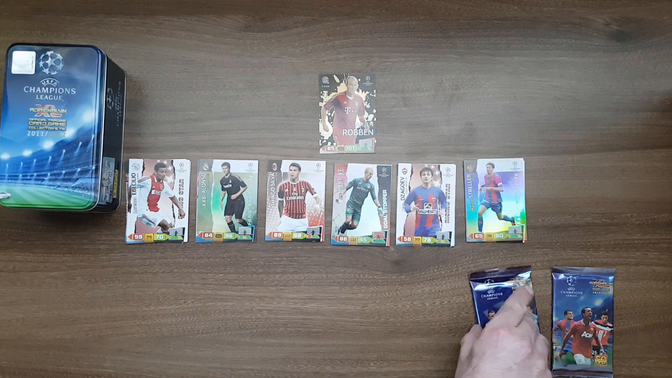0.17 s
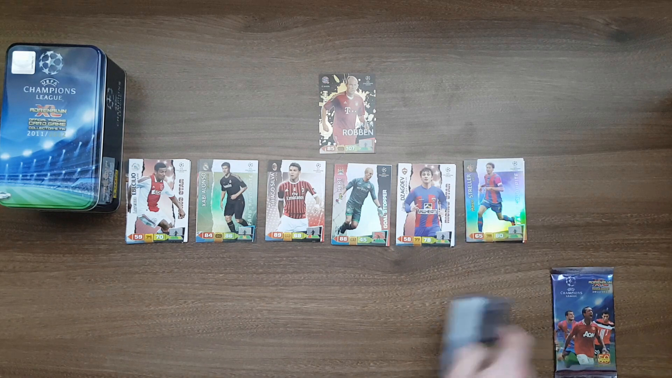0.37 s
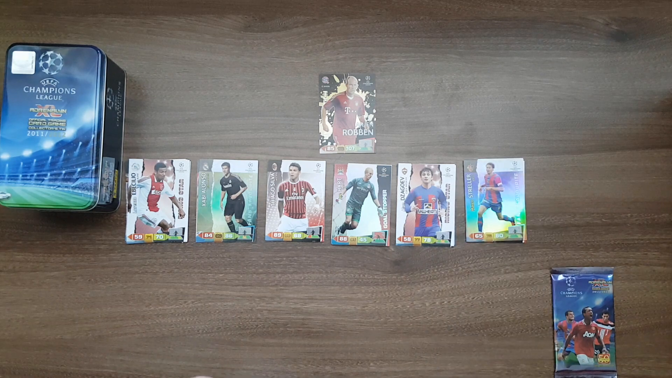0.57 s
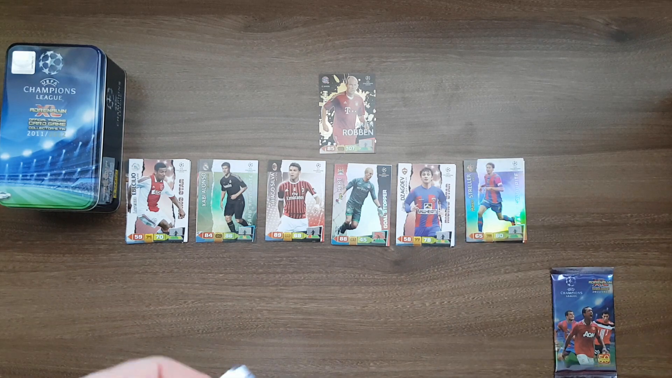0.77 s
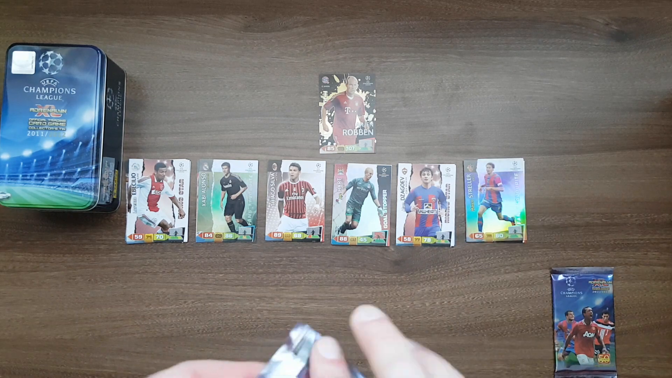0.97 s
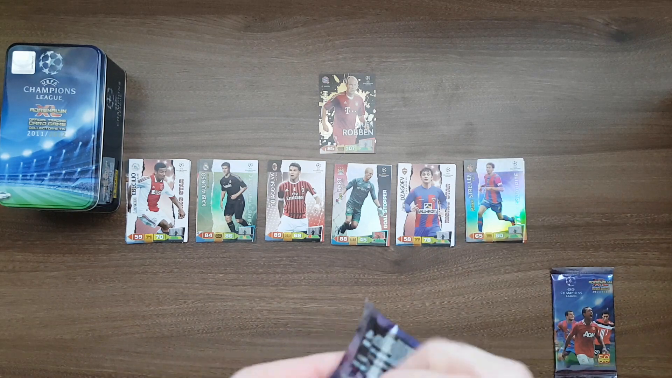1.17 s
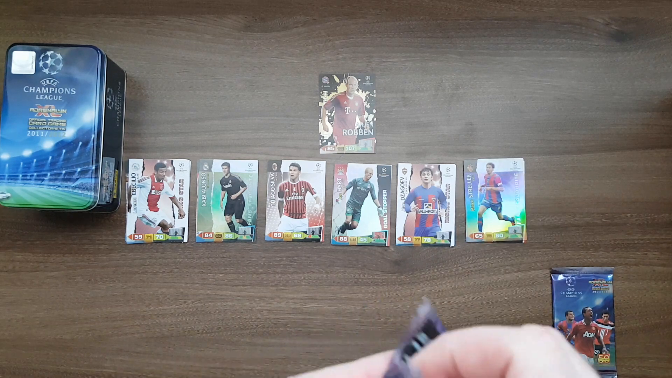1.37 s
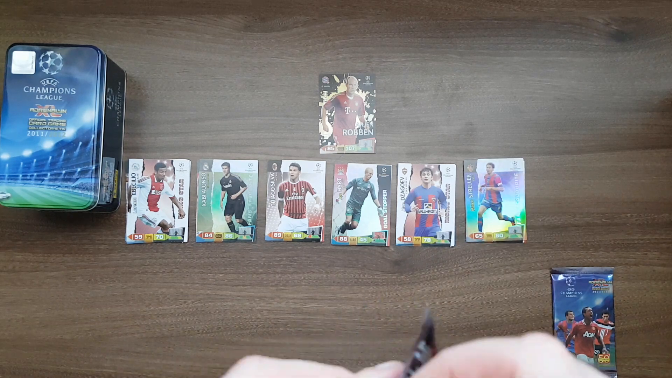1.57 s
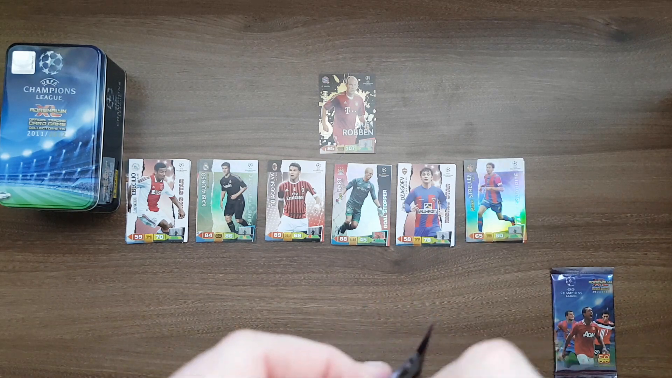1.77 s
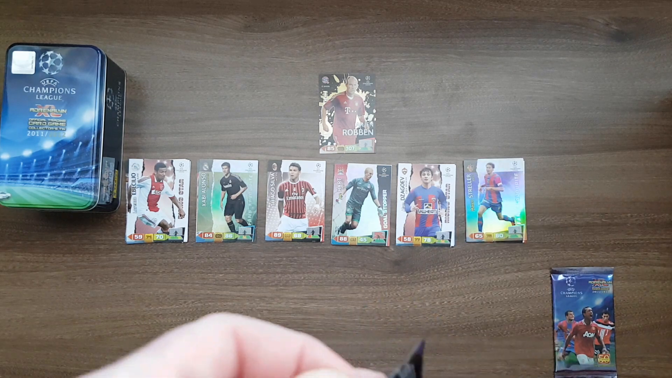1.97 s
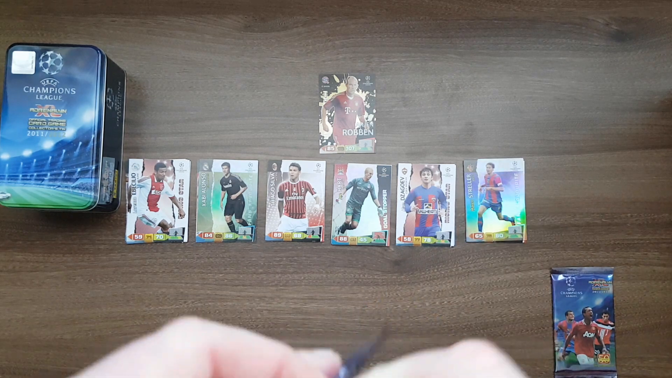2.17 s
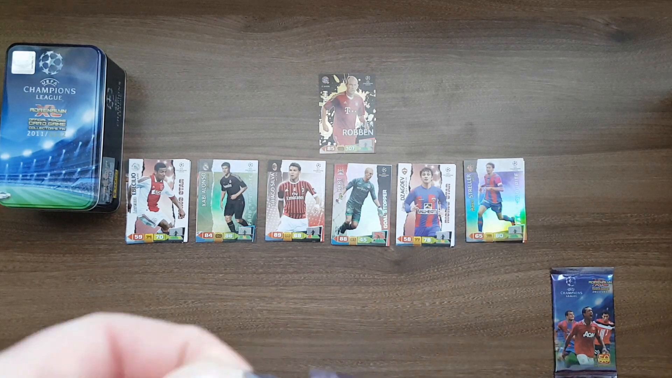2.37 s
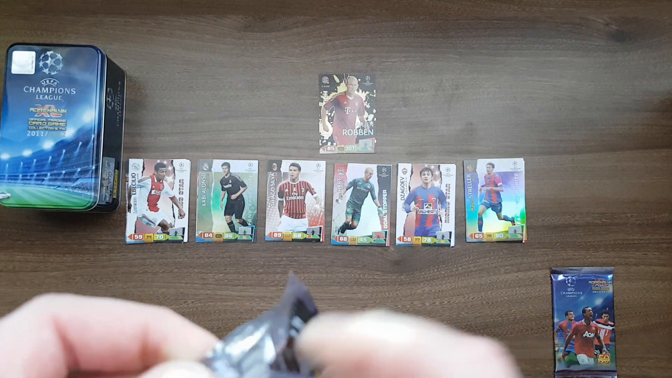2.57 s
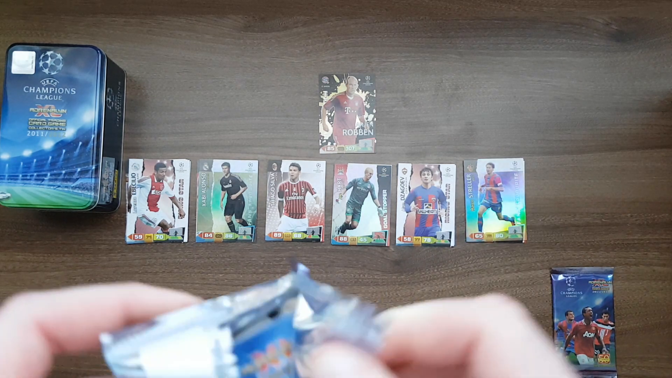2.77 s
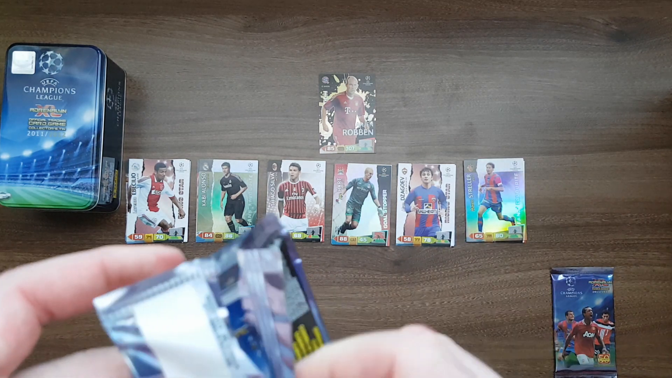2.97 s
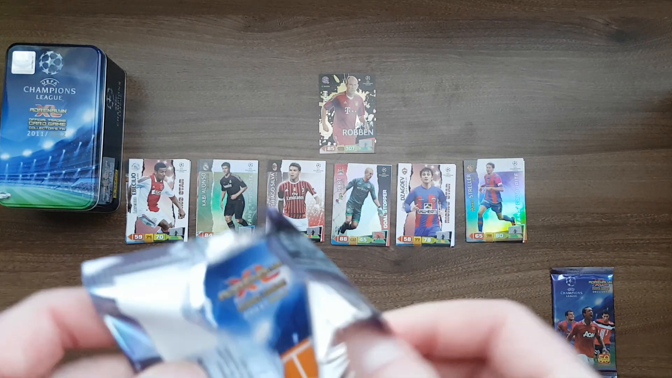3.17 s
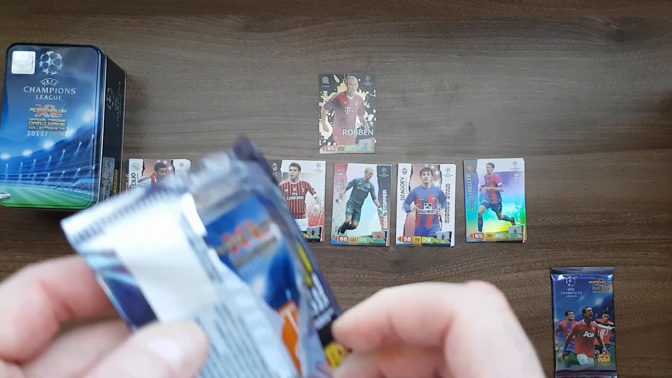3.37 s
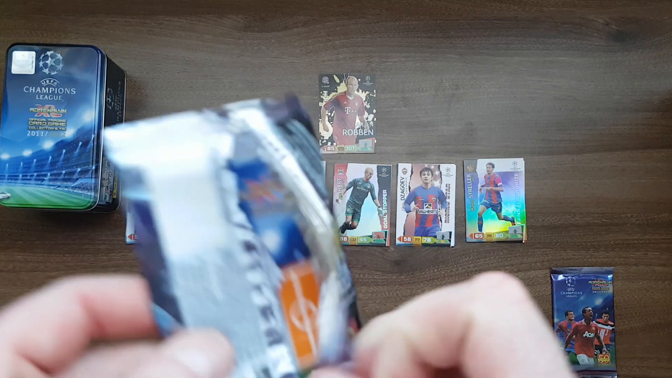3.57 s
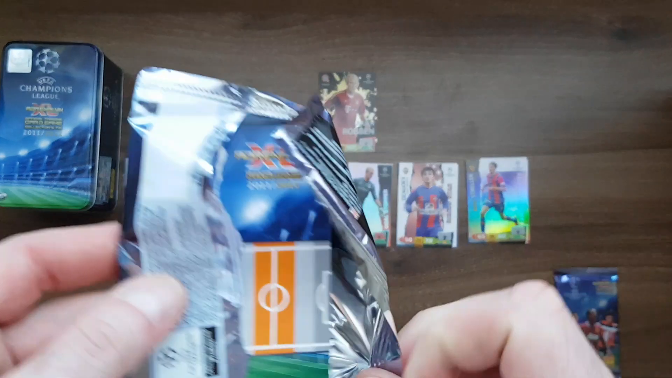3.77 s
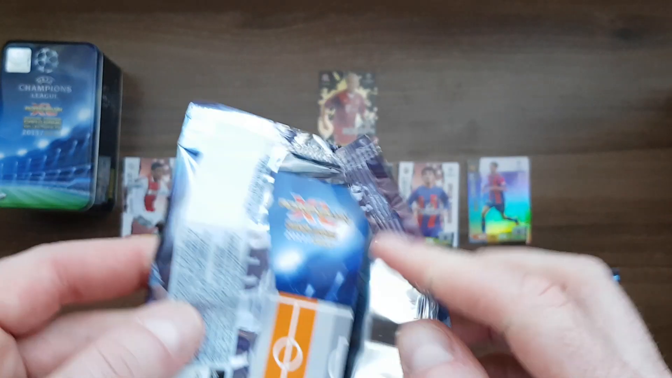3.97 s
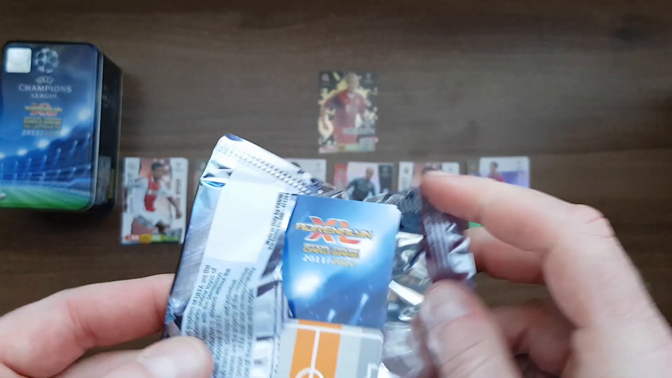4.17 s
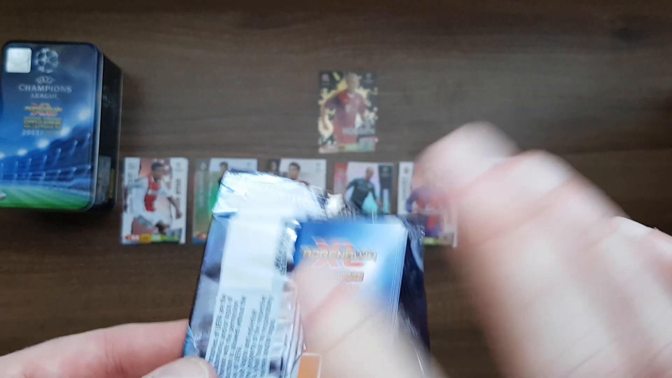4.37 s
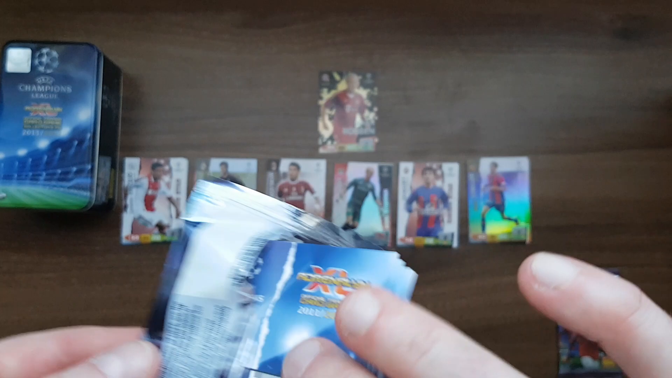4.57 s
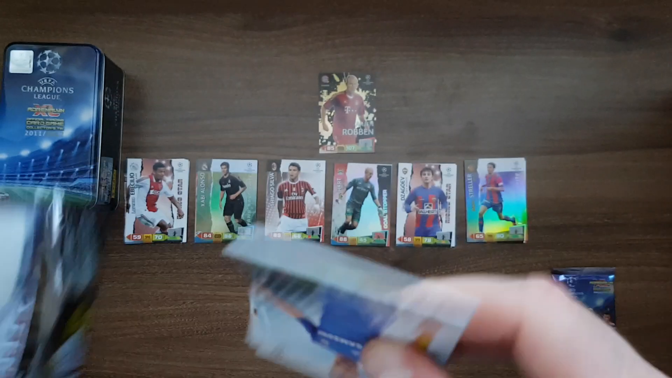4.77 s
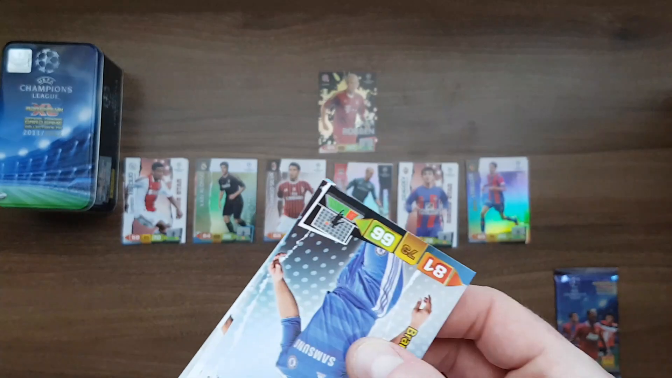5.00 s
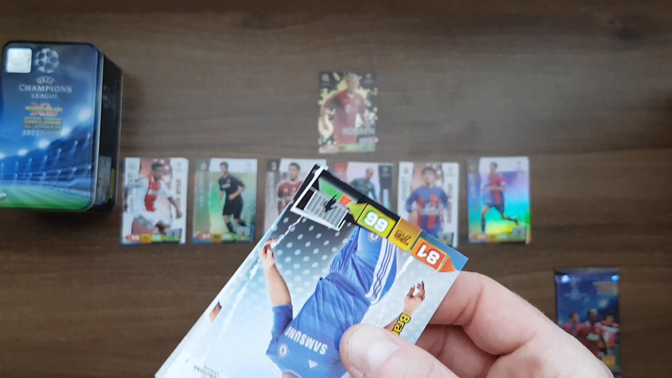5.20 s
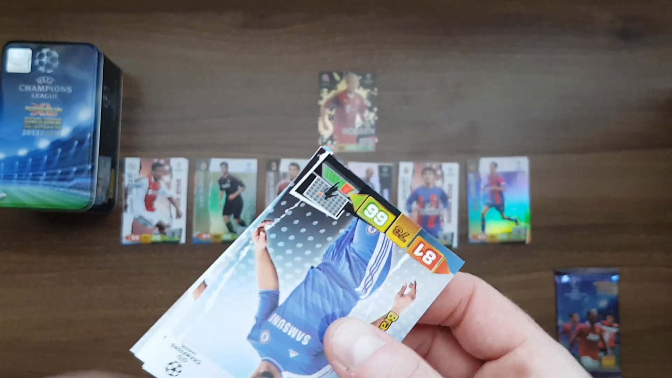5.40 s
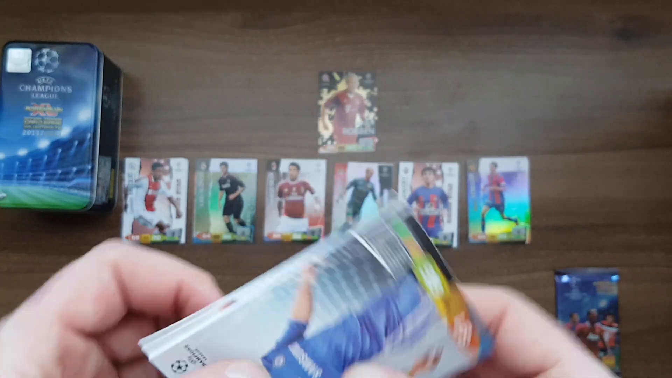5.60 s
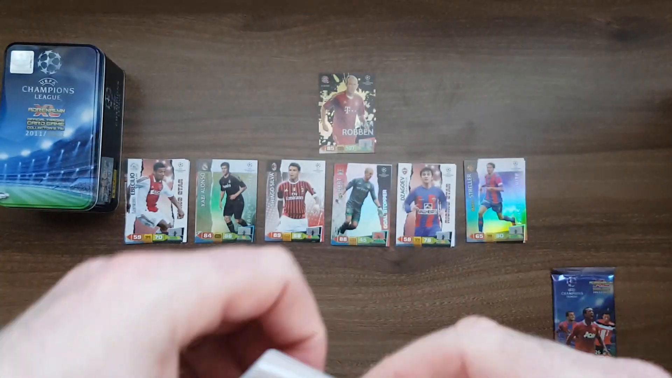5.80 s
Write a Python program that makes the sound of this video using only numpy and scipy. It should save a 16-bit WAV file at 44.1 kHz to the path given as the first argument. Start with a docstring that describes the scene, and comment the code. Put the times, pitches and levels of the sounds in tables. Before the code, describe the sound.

In a small, quiet room with faint air noise and a low hum, a foil packet is handled very close to a stereo microphone, nearer the left side. From 0 to 0.5 s there is only a soft slide and light scuff on wood. From about 0.7 s crinkling begins, and from 1.1 to 2.3 s thin, taut foil gives sharp irregular snaps with sparse crackle between them. At 2.4 s a strong ripping burst hits, then crackling grows denser, with peaks near 3.25 and 3.7 s. The opened wrapper sounds fuller and looser, with dull low pops as its panels flex, especially from 2.6 to 4.4 s. Crackle thins after 4.0 s and ends around 4.9 s with a few snaps. Afterwards only very faint card slides, tiny ticks and one soft low bump near 5.6 s remain over the quiet room.

```python
"""A foil packet of trading cards is slid off a wooden table, pinched, torn open and emptied close to the mic.
Creases buckle as sharp band-coloured clicks over a dense crinkle of random smaller ones.
Once open, the wrapper flexes with dull pops of damped modes and sounds fuller; at the end the cards slide out
as resonant noise with a few faint ticks. The two-port microphone stands in a small, quiet room with a faint hum."""
import sys
import numpy as np
from scipy import signal
from scipy.fft import rfft, irfft, next_fast_len
from scipy.io import wavfile
from scipy.ndimage import uniform_filter1d

SR = 44100
rng = np.random.default_rng(int(sys.argv[2]) if len(sys.argv) > 2 else 0)


def wrap_up_sound(samples):
    """Save the sound to the file named by the first command line argument, as 16-bit audio."""
    columns = np.atleast_2d(samples).T
    # keep every value between -1 and 1, then stretch to whole-number steps
    tamed = np.clip(columns, -1, 1)
    steps = np.round(tamed * 32767).astype(np.int16)
    wavfile.write(sys.argv[1], SR, steps)


N = 257544
TIME = np.arange(N) / SR
EDGES = np.geomspace(55, 17500, 18)  # band edges, Hz
CENTRES = np.sqrt(EDGES[1:] * EDGES[:-1])


def from_db(db):
    """Decibels to an amplitude factor."""
    return 10 ** (np.asarray(db) / 20)


def rms_one(x):
    """Scale to unit rms."""
    return x / np.sqrt(np.mean(x ** 2) + 1e-20)


def at_hz(points, hz):
    """Read a table on a log-frequency axis."""
    f, value = np.transpose(points)
    return np.interp(np.log(np.maximum(hz, 1)), np.log(f), value)


def band(x, k):
    """The k-th half-octave band."""
    sos = signal.butter(2, EDGES[k:k + 2], "band", fs=SR, output="sos")
    return signal.sosfilt(sos, x + 1e-18)


def coloured(x, points, lag=0):
    """Give x a spectrum, and delay it by lag seconds."""
    size = next_fast_len(N + SR // 10)
    hz = np.arange(size // 2 + 1) * SR / size
    response = from_db(at_hz(points, hz)) * np.exp(-2j * np.pi * hz * lag)
    return irfft(rfft(x, size) * response, size)[..., :N]


def drift(rate):
    """Smooth chance with the given number of turns a second."""
    knots = rng.standard_normal(N // 20)
    return np.interp(TIME * rate, np.arange(len(knots)), knots)


# still air of the room: f/Hz, relative level per Hz/dB
AIR_COLOUR = [(15, -31), (25, 0), (74, -20), (92, -4.5), (111, -6), (153, -13), (263, -11.5), (363, -16.5),
              (503, -17.5), (560, -19.5), (1610, -23), (6210, -36), (16000, -35)]
AIR_DB = -67
HUM_HZ, HUM_DB = 112, -77.5


def still_room(likeness=0.35):
    """Air noise partly shared by the two ports, under a low hum whose phase wavers."""
    shared, *own = rng.standard_normal((3, N))
    noise = np.sqrt(likeness) * shared + np.sqrt(1 - likeness) * np.array(own)
    air = rms_one(coloured(noise, AIR_COLOUR))
    hum = rms_one(np.sin(2 * np.pi * HUM_HZ * TIME + .5 * drift(9.1)))
    return from_db(AIR_DB) * air + from_db(HUM_DB) * hum


# packet, fingers and cards sliding: start t/s, length/s, relative level/dB, centre f/Hz,
# width of each of two stacked resonators f/Hz
SLIDE_STROKES = [(0.026, 0.36, -68, 2780, 1030), (0.057, 0.23, -68, 10400, 8050),
                 (0.16, .14, -53, 153, 268), (0.161, 0.16, -61.5, 870, 1180), (0.34, 0.061, -49, 2100, 404),
                 (0.334, 0.16, -59, 353, 453), (0.391, 0.03, -40, 1700, 905),
                 (0.382, 0.079, -49.5, 6600, 9100), (0.41, 0.24, -68, 2020, 2230),
                 (0.648, 0.11, -54.5, 418, 420), (0.974, .05, -49.5, 1130, 357),
                 (4.8, .12, -64, 7300, 1200), (4.98, 0.23, -67, 2530, 3030), (5.126, .11, -68, 7000, 2520),
                 (5.133, 0.091, -64, 2380, 1106), (5.463, .2, -77.5, 4500, 5040)]
SLIDE_RISE_SHARE = 0.15  # part of a stroke spent swelling


def slides(level_db=0.0, grain_db=2.5):
    """Uneven friction drives one broad resonance while the stroke swells and fades."""
    out = 0
    for start, length, db, hz, width in SLIDE_STROKES:
        friction = rng.standard_normal(N) * from_db(grain_db * drift(395.2))
        r = np.exp(-np.pi * width / SR)
        resonator = [0.92, 0.0077, -1, 1, -2 * r * np.cos(2 * np.pi * hz / SR), r * r]
        rub = signal.sosfilt([resonator] * 2, friction)
        stroke = np.interp((TIME - start) / length, [0, SLIDE_RISE_SHARE, 1], [0, 1, 0])
        out = out + from_db(db + level_db) * stroke * rms_one(rub)
    return out


def dying(power, t60):
    """Spread energy over an exponential tail, its t60 held to 0.002-0.5 s."""
    r = from_db(-120 / (np.clip(t60, .002, .5) * SR))  # twice 60 dB, since this is power
    return signal.lfilter([1 - r], [1, -r], power + 1e-18)


# decay of the small room, before the limit in dying(): f/Hz, t60/s
WALL_DECAY = [(210, 0.75), (1300, 0.29), (4000, 0.25), (10000, 0.2)]
# reverberant against direct sound at this close distance, before patchiness: f/Hz, level/dB
WALL_LEVEL = [(100, -11), (400, -10.5), (1500, -4), (4000, -2.5), (8000, -6.5), (15000, -11)]


def room(x, scatter_db=-2.5, scatter_t60=0.022, build_t60=0.0093, patchy_db=3.5):
    """Hands and table scatter each sound at once, walls add a short tail; the packet moves, so tails vary."""
    out, white = x.copy(), rng.standard_normal((2, 3, N))
    for k, hz in enumerate(CENTRES):
        # the ports hear nearly the same diffuse sound only in the bass
        alike = at_hz([(300, .9), (1200, 0.18), (3000, 0.017)], hz)
        noise = np.sqrt(alike) * white[k % 2, 0] + np.sqrt(1 - alike) * white[k % 2, 1:]
        diffuse = rms_one(band(noise, k))
        power = band(x[0], k) ** 2
        near = from_db(2 * scatter_db) * dying(power, scatter_t60)
        tail = dying(dying(power, build_t60), at_hz(WALL_DECAY, hz))
        walls = from_db(2 * at_hz(WALL_LEVEL, hz)) * tail
        patchy = from_db(patchy_db * drift(35) + 0.5)  # its colour shifts as the sheet bends
        out += diffuse * np.sqrt(near + walls) * patchy
    return out


def clicks(at, heights):
    """Impulses at the given samples."""
    return np.bincount(np.clip(at, 0, N - 1), heights, N)


def buckles(at, signs, band_db, colour_spread_db, path_spread_s):
    """Sharp clicks from many places: each has its own colour, and its own lag between the ports."""
    lag = path_spread_s * SR * rng.standard_normal(N)[at]
    out = np.zeros((2, N))
    for k, hz in enumerate(CENTRES):
        both, left, right = rng.standard_normal((3, N // 16))[:, np.arange(len(at)) % (N // 16)]
        for port, (own, late) in enumerate([(left, 0), (right, lag)]):
            colour = colour_spread_db * (both + own) / np.sqrt(2)
            heights = signs * from_db(band_db(hz) + colour)
            impulses = clicks(np.round(at + late).astype(int), heights)
            out[port] += band(impulses, k) * (-1) ** k  # every other band is inverted
    return out


# sharp snaps: creases buckling in the hands, and from 5 s a few faint ticks of the cards:
# t/s, relative level/dB, body at 900 Hz against that level/dB
SHARP_SNAPS = [(0.5274, -36.5, 8), (0.7292, -19, 11), (0.7895, -21, 10.5), (0.8496, -22.5, 3),
               (0.945, -23, -7), (0.989, -16, 1), (1.072, -4, -22), (1.1605, -14, -12), (1.179, -5.5, -4.5),
               (1.2552, -5.5, -8.5), (1.2806, -4.5, -22), (1.2928, -23, -19), (1.304, -17, -3.5),
               (1.3273, -9, -15), (1.3667, -8.5, -19), (1.3965, -10.5, -1), (1.4863, -2, -46),
               (1.526, -12.5, -2.5), (1.6401, -9, -1.5), (1.7639, -13, -18), (1.842, -24, -2),
               (1.8623, -21, -3.5), (1.961, -15.5, 1), (1.9873, -6.5, -20.5), (2.0456, -17, -8),
               (2.0757, -24.5, -0.5), (2.1128, -18, -5), (2.1464, -11.5, -7), (2.2378, -4.5, -10.5),
               (2.3417, -10.5, -10.5), (2.3769, 1.5, 1.5), (2.403, -8.5, 10), (2.4224, -2, 3.5),
               (2.525, -14.5, 13.5), (2.5763, -13.5, 1), (2.5985, -7.5, 8), (2.6379, -5, -1.5),
               (2.744, -16, 8.5), (2.761, -10.5, -2.5), (2.7983, -7, -20), (2.823, -20, 9),
               (2.8409, -0.5, -23), (2.8649, -6.5, 1.5), (2.8965, -15.5, 21.5), (2.9144, -2, 4),
               (2.9463, -11, -13), (3.0022, -7.5, -2), (3.1151, -13.5, -9), (3.1663, -6.5, 1),
               (3.1947, -1.5, -4.5), (3.2467, 3.5, 5), (3.3575, -3, -15.5), (3.3995, -12.5, -4),
               (3.4227, -13.5, -3.5), (3.453, -12.5, -8.5), (3.484, -3.5, -2.5), (3.542, -6, 0.5),
               (3.595, -1.5, -2), (3.599, 0, 3.5), (3.636, -2.5, 6.5), (3.6565, -3.5, 7), (3.6725, 1, 7),
               (3.6944, -4.5, 14), (3.728, 1, 14), (3.7471, -3, 8), (3.7846, -23, 3.5), (3.808, -12.5, 10),
               (3.825, -6.5, 14.5), (3.9193, -3.5, 10), (3.957, -6, 4), (3.9852, -5.5, 7), (4.175, -10, 7),
               (4.2098, -12, 0), (4.3305, -7.5, 7), (4.4044, -5, -1), (4.456, -29, 21), (4.522, -43, 29.5),
               (4.6339, -16.5, 8), (4.6703, -13, 1), (4.7535, -13.5, -9), (4.8343, -12.5, -6),
               (5.0054, -42, -5), (5.0772, -43, 4), (5.6238, -40.5, 6.5)]
# treble edge of a big snap, and its gain per dB as snaps get smaller: smaller ones tick brighter
SNAP_EDGE_DB, EDGE_GAIN_PER_DB = -1, 1.1055
SMALL_SNAP_DB, BIG_SNAP_DB = -20, -13


def snaps(level_db=-2.5, colour_spread_db=1.0, bass_db=-30.5, follower_db=-17.0,
          scatter_s=0.0051, lead_s=0.0014, count=6):
    """A crease or card snaps at once amid smaller clicks beside it; so small a patch radiates little bass."""
    s, db, body = np.repeat(np.transpose(SHARP_SNAPS), count, axis=1)
    smallness = BIG_SNAP_DB - np.clip(db, SMALL_SNAP_DB, BIG_SNAP_DB)
    edge = SNAP_EDGE_DB + EDGE_GAIN_PER_DB * smallness
    when, size, sign = rng.standard_normal((len(s), 3)).T
    minor = np.arange(len(s)) % count > 0  # all but the first of each group
    at = np.round((s + minor * (scatter_s * np.abs(when) - lead_s)) * SR).astype(int)
    db = db + level_db + minor * (follower_db + 3 * size)

    def band_db(hz):
        """Level of each click in the band at hz."""
        low = at_hz([(900, 1), (3000, 0)], hz)
        high = at_hz([(6000, 0), (11000, 1)], hz)
        bass = at_hz([(100, 1), (700, 0)], hz)
        return db + low * body + high * edge + bass * bass_db
    return buckles(at, np.sign(sign), band_db, colour_spread_db, path_spread_s=.00006)


def facets(level_db=-30.0, t60=0.023, spread_octaves=0.94, count=3):
    """Stiff facets beside a snap ring briefly, lower when the snap has more body."""
    out, t = np.zeros(N + SR), np.arange(SR // 20) / SR
    chances = spread_octaves * (2 * rng.random((len(SHARP_SNAPS), count)) - 1)
    for (s, db, body), chance in zip(SHARP_SNAPS, chances):
        pitches = at_hz([(1, 1400), (3, 2400), (8, 4500)], from_db(10 - body)) * 2 ** chance
        at = int(s * SR)
        modes = np.sin(2 * np.pi * pitches[:, None] * t).sum(0)
        out[at:at + len(t)] += from_db(db + level_db - 60 * t / t60) * modes
    return out[:N]


def ring(x, hz, t60):
    """A unit click sets a damped sine of height 1 ringing."""
    r, w = from_db(-60 / (t60 * SR)), 2 * np.pi * hz / SR
    return signal.lfilter([0, np.sin(w)], [1, -2 * r * np.cos(w), r * r], x + 1e-18)


# things on the table that ring along: f/Hz, relative level/dB, t60/s before a 0.25 s limit
TABLE_RINGS = [(340.5, -50, 0.136), (505.5, -52.5, 0.247), (548, -57, 0.66), (876, -59.5, 0.195),
               (1014, -56, 0.037), (1390, -60, 0.18), (1610, -57.5, 0.062), (1670, -61, 0.18),
               (1792, -54.5, 0.14), (2113, -58.5, 0.15), (2470, -57.5, 0.2), (4180, -56, 0.31)]


def table_ringing(foil, level_db=1.0):
    """The foil's sound at the left port drives the modes of things on the table."""
    return sum(from_db(db + level_db) * ring(foil[0], hz, min(t60, 1 / 4)) for hz, db, t60 in TABLE_RINGS)


# each pinch, pull or squeeze of the foil: strongest t/s, relative crackle level/dB, rise/s, fade/s
HAND_SQUEEZES = [(0.728, -49.5, 0.16, 0.13), (0.894, -45, .24, 0.147), (0.99, -43, 0.022, .12),
                 (1.074, -39, .03, .18), (1.18, -40, .08, 0.089), (1.253, -41, .04, .36),
                 (1.487, -41.5, .05, .22), (1.648, -43, 0.19, 0.106), (1.768, -51, 0.09, .25),
                 (1.96, -38, 0.0894, .2), (2.145, -45, .02, .12), (2.235, -46, .02, .03),
                 (2.28, -47, .05, .05), (2.391, -28.5, .022, 0.1), (2.409, -26.5, 0.046, 0.11),
                 (2.524, -39.5, 0.1207, 0.043), (2.598, -33.5, .03, .05), (2.664, -39, 0.084, .07),
                 (2.84, -35.5, .08, .22), (3.009, -42.5, .07, .09), (3.16, -39, .05, .25),
                 (3.243, -25, .14, .07), (3.298, -39.5, .12, 0.31), (3.596, -35.5, .08, .18),
                 (3.668, -23, .06, .12), (3.742, -29, .14, .17), (3.985, -34.5, .22, .13),
                 (4.17, -42.5, 0.07, 0.25), (4.322, -44, .14, 0.18), (4.421, -38, 0.12, 0.086),
                 (4.635, -46.5, 0.053, 0.3565), (4.759, -45, 0.28, .07), (4.833, -46.5, 0.023, 0.065)]
CRACKLE_POWER = 2.1  # crackle grows with this power of the fingers' pressure


def squeezing():
    """Crackle level in dB: pressure rises and falls, and the strongest squeeze of the moment leads."""
    level = np.full(N, -100.)
    for s, db, rise, fade in HAND_SQUEEZES:
        pressure = np.interp(TIME, [s - rise, s, s + fade], [0, 1, 0])
        level = np.maximum(level, db + CRACKLE_POWER * 20 * np.log10(pressure + 1e-9))
    return level


# colour of the crinkle: f/Hz, relative level/dB
FOIL_COLOUR = [(75, -6), (135, -8), (270, -2), (430, -11.5), (850, -1.5), (1450, -1.5), (2100, 5.5),
               (3100, -5), (4500, -3), (7400, -1.5), (10500, -5), (15000, -4.5)]
# the taut, sealed packet sounds thin and the loose, open one full:
# t/s, relative level of the sheet's body against its crackle/dB
SHEET_FULLNESS = [(0.9, -5), (1.2, -13.5), (1.5, -14), (1.65, -9), (2.4, -15), (2.55, -9), (3.0, -3.5),
                  (3.24, -8.5), (3.55, -1.5), (3.67, -9), (3.74, -2), (3.85, -3), (4.6, -1.5), (4.85, -1)]
EDGE_LOSS_PER_FULLNESS = 0.45  # dB per dB: slack foil loses its sharp edge


def crinkle(sparse_per_s=700, dense_per_s=2400, size_spread_db=6.5, colour_spread_db=5.5, clump_db=2.0,
            crackle_db=-7.0, body_db=-7.0, edge_db=-10.0, evening_s=0.028):
    """Tiny buckles and tearing fibres come in clumps, the more of them the harder the foil is worked."""
    crackle, fullness = squeezing(), np.interp(TIME, *np.transpose(SHEET_FULLNESS))
    body, edge = crackle + fullness, crackle - EDGE_LOSS_PER_FULLNESS * fullness
    effort = np.clip((crackle + 60) / 30, 0, 1)
    per_s = (sparse_per_s + effort ** 2 * dense_per_s) * from_db(clump_db * drift(70))
    born = rng.random(N) < per_s / SR
    spread = from_db(size_spread_db * np.minimum(rng.exponential(1, N), 4))
    sizes = born * spread * rng.choice([-1, 1], N)
    # the hand feeds in energy steadily, and the buckles share it out
    window = int(evening_s * SR)
    energy = uniform_filter1d(uniform_filter1d(sizes ** 2, window), window)
    sizes = sizes / np.sqrt(np.abs(energy) + 1e-4)
    at = np.flatnonzero(born)

    def per_width(level, trim, width_hz):
        """Spread a level over the width of its range."""
        return level[at] + trim - 10 * np.log10(2 * width_hz / SR)
    body = per_width(body, body_db, 1000)
    crackle = per_width(crackle, crackle_db, 5500)
    edge = per_width(edge, edge_db, 8000)

    def band_db(hz):
        """Level of each click in the band at hz."""
        low = at_hz([(1100, 1), (2600, 0)], hz)
        high = at_hz([(6000, 0), (10500, 1)], hz)
        return low * body + (1 - low - high) * crackle + high * edge + at_hz(FOIL_COLOUR, hz)
    return buckles(at, sizes[at], band_db, colour_spread_db, path_spread_s=.00007)


# whole panels flexing under the fingers: t/s, relative level/dB, middle mode before detuning f/Hz
PANEL_FLEXES = [(0.652, -47.5, 444), (0.779, -51, 284), (2.376, -41.5, 266.8), (2.589, -30, 437),
                (2.66, -35.5, 276), (2.761, -31.5, 288), (2.814, -35.5, 274), (2.995, -30.5, 311),
                (3.237, -39.5, 241.9), (3.331, -27, 300), (3.557, -32, 272.7), (3.633, -32, 283.5),
                (3.724, -27.5, 345), (3.809, -46.5, 318), (3.892, -27, 259), (3.951, -23, 111.5),
                (3.982, -27.5, 244), (4.063, -30.5, 123), (4.184, -35, 190.4), (4.315, -34.5, 285),
                (4.357, -33, 258), (4.41, -30, 279), (4.425, -26.5, 100), (4.745, -39.5, 250.4),
                (4.825, -32.5, 244), (5.614, -43, 104.5)]


def flexes(level_db=-5.0, t60=0.038, span_s=.017, lower_db=-5.0, upper_db=-4.5, count=5):
    """A panel pops through in a few quick jerks, each stirring three well damped modes."""
    out, t = np.zeros(N + SR), np.arange(SR // 8) / SR
    for s, db, hz in PANEL_FLEXES:
        for when, size, *detune in rng.uniform(-1, 1, (count, 5)):
            pitches = hz * np.array([.48, 1, 1.8]) * (1 + np.array(detune) * [.25, .12, .25])
            modes = from_db([lower_db, 0, upper_db]) @ np.cos(2 * np.pi * pitches[:, None] * t)
            wobble = modes * np.minimum(t * hz, 1)  # swells over one cycle
            height = from_db(db + level_db + 1.3 * size - 60 * t / t60)
            at = int((s + abs(when) * span_s) * SR)
            out[at:at + len(t)] += np.sign(when) * height * wobble
    return out[:N]


# the right port faces away from the hands: f/Hz, level against an unshaded port/dB
RIGHT_SHADE = [(60, -9.5), (200, -2.5), (700, -5.5), (1500, -0.5), (3000, -5), (6500, -0.5), (8000, 0),
               (9500, -16), (16000, -8.5)]
RIGHT_LAG_S = 0.00023


def scene():
    """The wrapper is held nearer the left port, so the right hears it shaded and late."""
    foil = snaps() + crinkle() + facets()
    ringing = table_ringing(foil)
    left, right = room(foil + flexes() + slides()) + ringing
    return np.array([left, coloured(right, RIGHT_SHADE, RIGHT_LAG_S)]) + still_room()


def record(dry):
    """The microphone loses the deepest bass, the highest peaks are rounded and the top is cut."""
    thin = signal.sosfilt(signal.butter(1, 30, "high", fs=SR, output="sos"), dry)
    top_cut = signal.ellip(12, .1, 80, 16100, fs=SR, output="sos")
    return signal.sosfilt(top_cut, np.tanh(thin))


dry = scene()
out = record(dry)
wrap_up_sound(out)
```